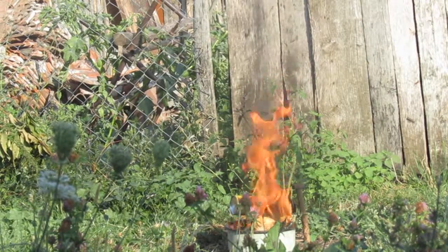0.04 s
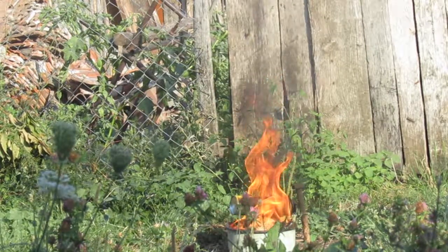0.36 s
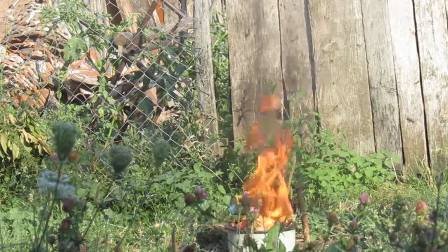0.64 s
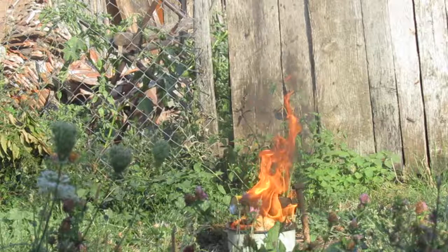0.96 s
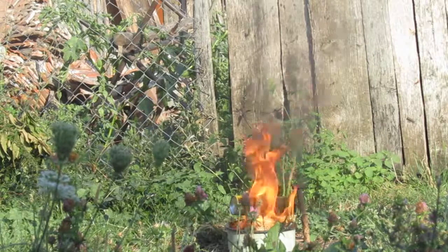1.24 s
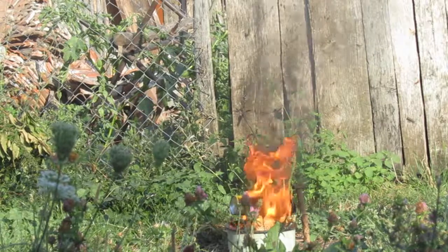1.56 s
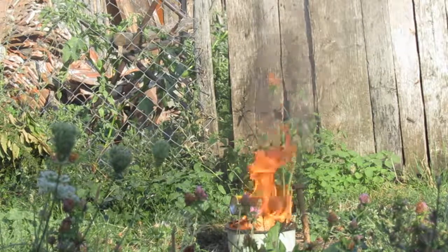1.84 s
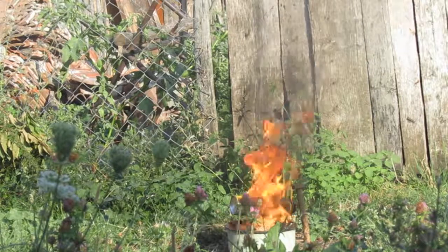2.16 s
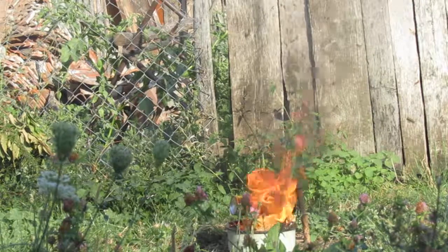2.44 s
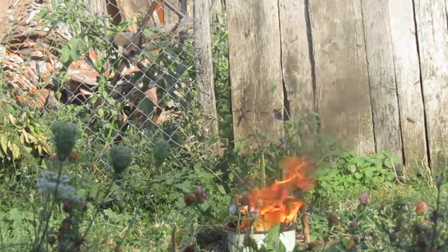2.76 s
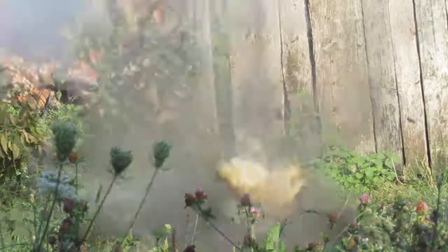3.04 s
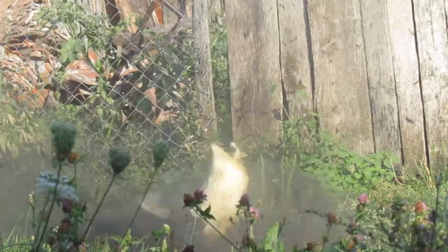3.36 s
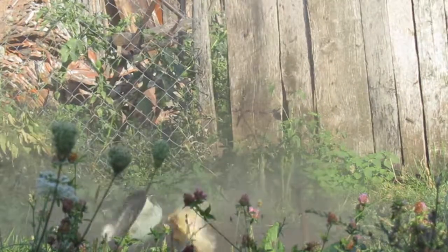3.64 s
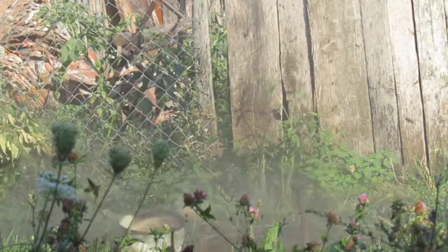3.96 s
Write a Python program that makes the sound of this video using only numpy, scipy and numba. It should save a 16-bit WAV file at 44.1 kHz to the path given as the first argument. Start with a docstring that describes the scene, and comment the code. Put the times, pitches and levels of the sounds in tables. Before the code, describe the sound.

A single explosion overloads a nearby microphone in a garden. Before it, faint distant town noise and two ringing pops from a heated metal container; after it, short dull echoes, a clang and debris raining on leaves.

```python
"""Container bursting in a garden fire

One microphone in a small garden, close to the fire, with insects around and the town far off.
A metal container pings twice as the pressure bulges it, then bursts. The blast overloads the microphone
and echoes off fences and houses; scraps patter into the plants while the recorder's gain control
slowly lets the distant town back in."""
import sys
import numpy as np
from scipy import signal
from scipy.fft import rfft, irfft
from scipy.io import wavfile
from numba import njit

SR = 44100
rng = np.random.default_rng(int(sys.argv[2]) if len(sys.argv) > 2 else 0)


def master_out(mix):
    """Clip the mix to full scale and print it as 16-bit PCM to the path in sys.argv[1]."""
    frames = np.transpose(np.atleast_2d(mix))
    ceiling = np.clip(frames, -1, 1)
    pcm = np.round(ceiling * 32767).astype(np.int16)
    wavfile.write(sys.argv[1], SR, pcm)


N = 176400


def undb(db):
    """Decibels to amplitude."""
    return 10 ** (np.asarray(db) / 20)


def since(start):
    """Seconds gone by after start, zero before it."""
    return np.maximum(np.arange(N) / SR - start, 0)


def rise(start, attack):
    """Build-up from 0 to 1 with a time constant of attack seconds."""
    return 1 - np.exp(-since(start) / attack)


def fade(start, t60, attack=.0003):
    """Rise, then exponential decay of 60 dB in t60 seconds."""
    return rise(start, attack) * np.exp(-np.log(1000) * since(start) / t60)


def swell(start, length):
    """One smooth rise and fall."""
    return np.sin(np.pi * np.minimum(since(start) / length, 1))


def tone(start, hz):
    """A sine that sets in at start."""
    return np.sin(2 * np.pi * hz * since(start))


def ring(start, hz, t60):
    """A struck mode: a sine dying away."""
    return tone(start, hz) * np.exp(-np.log(1000) * since(start) / t60)


def bins():
    """Frequency of each spectral bin, kept above zero."""
    return np.maximum(np.arange(N // 2 + 1), 1) * SR / N


def colour(x, points):
    """Shape x by (frequency [Hz], relative level [dB]) points, at rms 1."""
    points = np.array(points)
    gain_db = np.interp(np.log(bins()), np.log(points[:, 0]), points[:, 1])
    y = irfft(rfft(x) * undb(gain_db), N)
    return y / np.std(y)


def noise(points):
    """Noise with the given spectrum, at rms 1."""
    return colour(rng.standard_normal(N), points)


def band(hz, width, order=2):
    """Noise through order resonators in series, each width Hz wide, at rms 1."""
    detuning = (bins() / hz - hz / bins()) * hz / width
    y = irfft(rfft(rng.standard_normal(N)) / (1 + 1j * detuning) ** order, N)
    return y / np.std(y)


def tail(start, bands, attack):
    """Noise in overlapping bands, each dying at its own rate."""
    spectrum = rfft(noise(bands))
    log_centres = np.log([hz for hz, _, _ in bands])
    out = 0
    for (_, _, t60), share in zip(bands, np.eye(len(bands))):
        weight = np.interp(np.log(bins()), log_centres, share)
        out += irfft(spectrum * weight, N) * fade(start, t60, attack)
    return out


def town():
    """Far beyond the fences: wavering town noise, the hum of motors and one faint hoot."""
    # town noise (frequency [Hz], relative level [dB])
    spectrum = [(12, -61.5), (20, -32.5), (37, -17), (54, -5.5), (70, -0.5), (87, -1), (112, -10.5),
                (153, -3), (342, -12), (416, -8.5), (452, -7.5), (631, -8.5), (725, -11.5), (1040, -7),
                (1130, -11.5), (1500, -15), (1670, -14.5), (1870, -19.5), (2400, -26), (2680, -25),
                (3350, -26.5), (7310, -29.5), (9390, -34.5), (10200, -31.5), (15500, -43)]
    # distant motors (frequency [Hz], level [dB], width [Hz])
    motors = [(72, -61.5, 11), (639, -66.5, 9.8), (1018, -61.5, 72)]
    hums = sum(undb(db) * band(hz, width) for hz, db, width in motors)
    hoot = undb(-47) * swell(.04, length=.15) * tone(.04, hz=672)
    waver_db = .4 * band(hz=2.5, width=7.7)
    return undb(-48 + waver_db) * noise(spectrum) + hums + hoot


def whine():
    """The recorder's own thin, steady whine."""
    # pure tones (frequency [Hz], rms level [dB])
    partials = [(2724, -73), (11795, -78)]
    return sum(undb(db) * np.sqrt(2) * tone(0, hz) for hz, db in partials)


def insects():
    """A thin steady chorus in the garden, and one nearer insect chirping about once a second."""
    # chirps (time [s], level [dB])
    chirps = [(.35, -78), (1.32, -78), (2.27, -74)]
    # wing resonances (frequency [Hz], width [Hz], relative level [dB])
    wing_bands = [(10800, 600, 2), (13000, 300, -2)]
    chorus = undb(-77) * band(hz=10060, width=900)
    wings = sum(undb(db) * band(hz, width) for hz, width, db in wing_bands)
    return chorus + wings * sum(undb(db) * swell(start, length=.16) for start, db in chirps)


def rush():
    """Stirred air swells to a low rumble as the smoke spreads."""
    # moving air (frequency [Hz], relative level [dB])
    spectrum = [(20, 3.5), (60, 0), (150, -5), (450, -7.5), (700, -15), (2000, -32), (8000, -42)]
    return undb(-39.5) * noise(spectrum) * fade(3.45, t60=3.5, attack=.16)


def patter():
    """Fine bits rain down on the plants, each impact a tiny puff of noise."""
    # struck foliage (frequency [Hz], relative level [dB])
    spectrum = [(300, 8.5), (1500, 3), (4500, -4), (10000, -9), (15500, -19)]
    bits_per_s, puff_s = 1000, .0069
    impacts = (rng.random(N) < bits_per_s / SR) * rng.exponential(size=N)
    puffs = signal.lfilter([1], [1, -np.exp(-1 / (puff_s * SR))], impacts)
    rustle = colour(puffs * rng.standard_normal(N), spectrum)
    return undb(-43.5) * rustle * fade(3.28, t60=4.2, attack=.066)


def debris():
    """The contents spray through the leaves, scraps land among them and one piece of metal rings."""
    # spray on leaves (frequency [Hz], relative level [dB])
    spray_spectrum = [(1000, -14), (4000, -8), (6500, 0), (9000, -5), (13000, -7), (15500, -18)]
    # scraps landing (time [s], level [dB], centre [Hz], t60 [s])
    landings = [(3.322, -43, 7600, 0.2), (3.399, -38, 3600, .13), (3.444, -35, 4100, .11),
                (3.624, -31, 1700, .14), (3.68, -39, 3470, .11), (3.718, -43, 2500, 0.15),
                (3.755, -45.5, 3200, 0.27), (3.795, -46.5, 5400, 0.16), (3.922, -43, 3200, 0.093)]
    spray = undb(-28) * noise(spray_spectrum) * fade(3.168, t60=.25, attack=.01)
    scraps = sum(undb(db) * band(hz, width=hz) * fade(start, t60, attack=.004)
                 for start, db, hz, t60 in landings)
    clang = undb(-25) * ring(3.33, hz=440, t60=.48)
    grit_db = 2.5 * band(hz=220, width=440)  # leaves break each rustle into grains
    return undb(grit_db) * (spray + scraps) + clang


def echoes():
    """Only the boom comes back from far house walls, as short dull pulses."""
    # arrivals at the microphone (time [s], level [dB])
    arrivals = [(3.112, 1.5), (3.154, -10), (3.207, -17), (3.238, -18), (3.268, -13), (3.362, -22),
                (3.532, -28.5)]
    return -sum(undb(db) * swell(start, length=.02) ** 2 * tone(start, hz=144) for start, db in arrivals)


def pings():
    """The container wall snaps outward with a thump; a few strong modes ring over many weak ones."""
    # the wall buckles (time [s], thump level [dB], ring level [dB], crackle level [dB])
    buckles = [(2.0207, -18.5, -38, -39.5), (2.1853, -17.5, -38.5, -42)]
    # shell modes (frequency [Hz], t60 [s], build-up [s], relative level at ping 1 [dB], at ping 2 [dB])
    modes = [(845, 0.29, .01, -9, -4), (1415, .45, 0.032, -3, 5), (2144, 0.29, 0.0047, -5, -9.5),
             (2498, 0.16, .002, 1, -20), (2690, 0.43, 0.0022, -15, -13), (2853, .3, 0.0022, -7.5, -8),
             (2915, .2, .002, -2, -18), (3070, 0.37, .002, -9, -10), (3359, 0.43, .002, -19, -11),
             (3575, 0.16, .001, -5, 2), (3871, 0.16, .001, -6, -4), (3957, .15, .001, -7, -9.5),
             (4560, .2, .001, -11, -14)]
    # the wall's snap (frequency [Hz], relative level [dB])
    snap_spectrum = [(100, -1), (350, 7), (700, 2), (1300, -7), (3000, -4), (4300, -2), (6000, -24),
                     (15500, -34)]
    # the crowd of weak modes (frequency [Hz], relative level [dB])
    crackle_spectrum = [(150, -8), (400, -4), (1500, -4), (2600, 0), (3800, -3), (4800, -5), (6000, -18),
                        (11000, -22), (15500, -32)]
    out = 0
    for ping, (start, thump_db, ring_db, crackle_db) in enumerate(buckles):
        shell = sum(undb(levels[ping]) * ring(start, hz, t60) * rise(start, build_up)
                    for hz, t60, build_up, *levels in modes)
        thump = ring(start, hz=547, t60=.0065) * rise(start, attack=.00055)
        snap = undb(-36) * noise(snap_spectrum) * fade(start, t60=.04)
        crackle = noise(crackle_spectrum) * fade(start, t60=.166, attack=.001)
        out += undb(thump_db) * thump + snap + undb(ring_db) * shell + undb(crackle_db) * crackle
    return out


def burst(start=3.0173):
    """Blast pressure at the microphone, which overloads near 1: cracks, a deep boom, roar and wash."""
    # air set ringing by the burst (frequency [Hz], level [dB], t60 [s])
    air_modes = [(147.1, 12.5, .6), (195, 5, .25), (227, 6, .25), (271, 3, 0.39), (308, 3, .2),
                 (427, 18, .11), (515, 8, .15), (717, 9, .06), (897, 8, .06), (1280, 7, .04)]
    # the shock, then its reflections off ground and fence boards (time [s], level [dB])
    shocks = [(3.0179, 17), (3.0217, 15), (3.0277, 8.5), (3.035, 13.5), (3.038, 7), (3.0436, 4)]
    # roar of the burst (frequency [Hz], relative level [dB], t60 [s])
    roar_bands = [(40, -5.5, .3), (100, 2.5, .25), (297, 4.5, 0.2), (600, -4, .24), (1200, -6, 0.21),
                  (2320, -10, .25), (5500, -15, .24), (10300, -20.5, 0.18), (15600, -33, 0.24)]
    # its wash around the gardens (frequency [Hz], relative level [dB], t60 [s])
    wash_bands = [(40, -10, 0.88), (75, 3, 1.0), (143, 9, .9), (285, -2, .8), (600, -10, .7),
                  (2000, -13, 0.7), (5500, -19.5, 0.58), (10000, -26.5, 0.32), (15500, -33, .5)]
    hold_s, release_s = .033, .0035
    cut_short = np.exp(-since(start + hold_s) / release_s)
    boom = cut_short * sum(undb(db) * ring(start, hz, t60) for hz, db, t60 in air_modes)
    cracks = band(hz=1400, width=2700) * sum(undb(db) * fade(time, t60=.012) for time, db in shocks)
    fence_slap = undb(-13.5) * band(hz=4500, width=7000, order=1) * fade(3.059, t60=.11, attack=.002)
    roar = undb(2.5) * tail(start, roar_bands, attack=.001)
    wash = undb(-16.5) * tail(start, wash_bands, attack=.03)
    return boom + cracks + fence_slap + roar + wash


def overload(pressure):
    """The microphone saturates; flat tops sag through its coupling capacitor, the preamp rounds them."""
    coupling_hz, preamp_hz, gain_db = 198, [42, 11600], 17.5
    sag = signal.butter(1, coupling_hz, "high", fs=SR, output="sos")
    preamp = signal.butter(2, preamp_hz, "band", fs=SR, output="sos")
    return undb(gain_db) * signal.sosfilt(np.vstack([sag, preamp]), np.tanh(pressure))


@njit
def follow(x, attack, release):
    """The gain control's level detector: climbs quickly, sinks slowly."""
    out, level = np.empty(len(x)), 1e-9
    for i in range(len(x)):
        if abs(x[i]) > level:
            level += (abs(x[i]) - level) * attack
        else:
            level *= release
        out[i] = level
    return out


def scene():
    """The garden in mono, from the far town to the burst close by."""
    background = town() + whine() + insects()
    aftermath = rush() + patter() + debris() + echoes()
    return (background + aftermath + pings() + overload(burst()))[None, :]


def record(dry):
    """The recorder's gain control ducks too late for the blast, which clips; the top treble is cut."""
    limit_db, attack_s, release_db_per_s, top_hz = -10, .0043, 13, 15800
    level = follow(dry[0], 1 / (attack_s * SR), float(undb(-release_db_per_s / SR)))
    gain = np.minimum(1, undb(limit_db) / level)
    clipped = np.clip(dry * gain, -1, 1)
    lowpass = signal.ellip(8, .2, 70, top_hz, fs=SR, output="sos")
    return signal.sosfilt(lowpass, clipped)


dry = scene()
out = record(dry)
master_out(out)
```